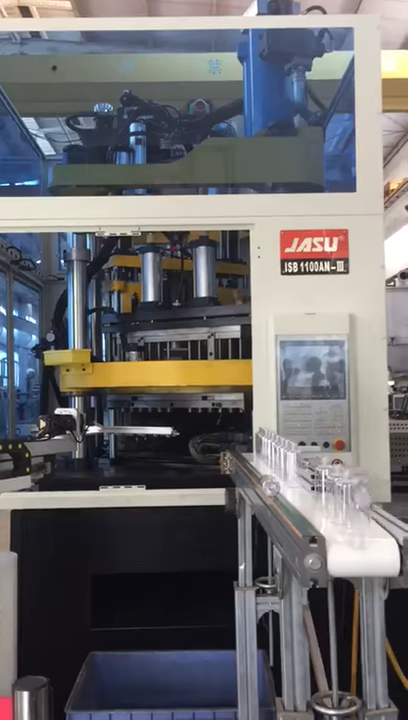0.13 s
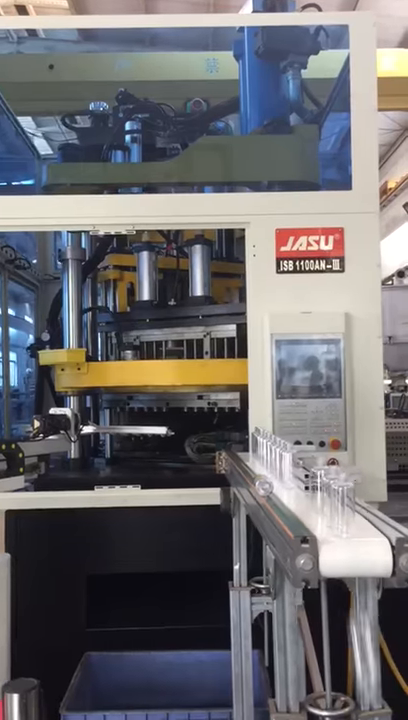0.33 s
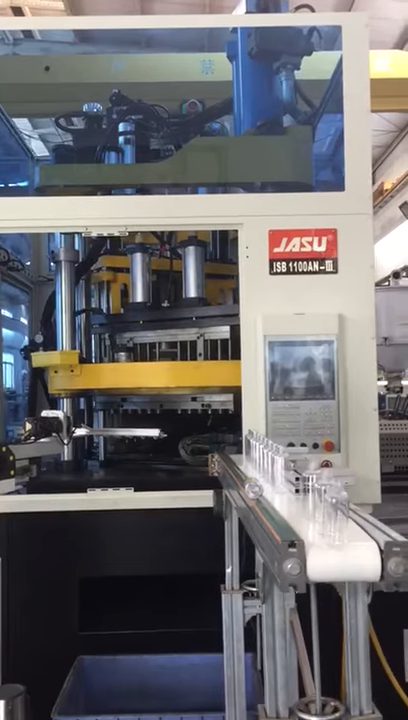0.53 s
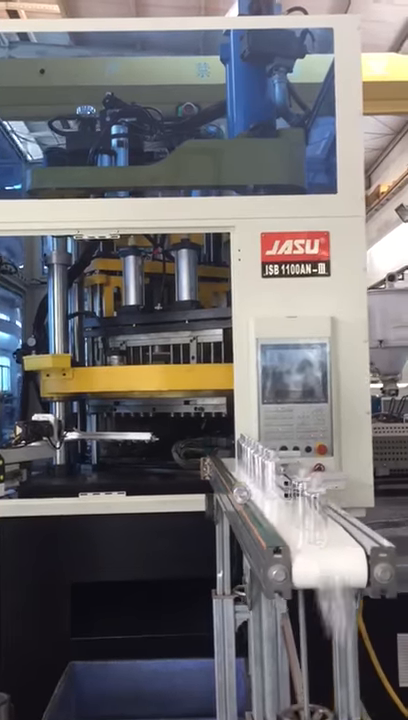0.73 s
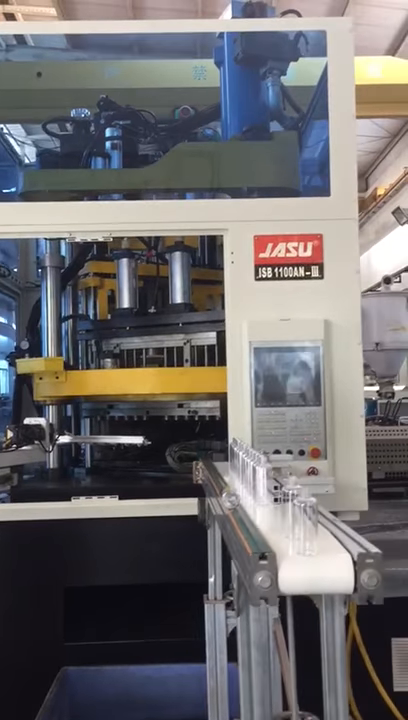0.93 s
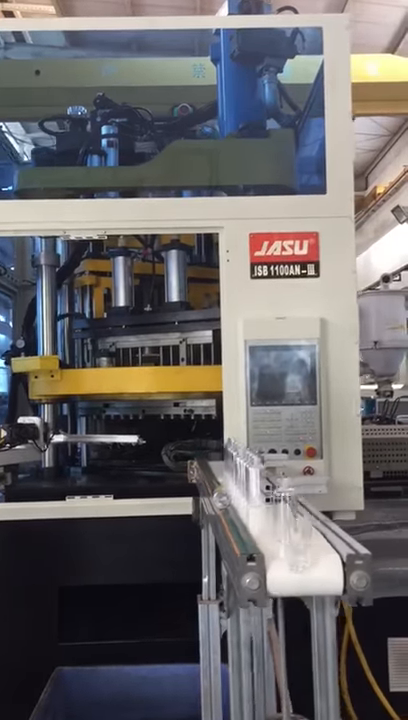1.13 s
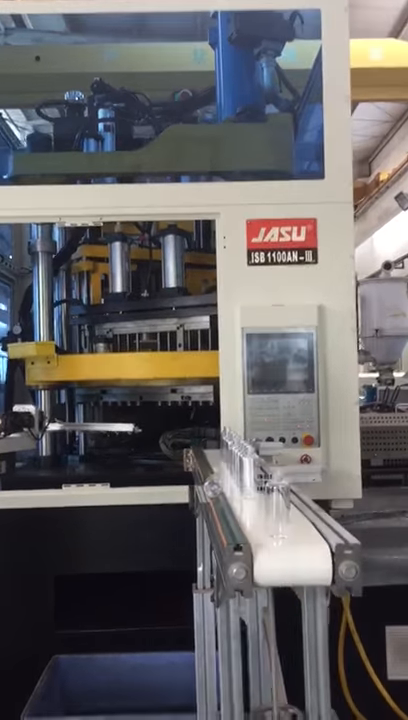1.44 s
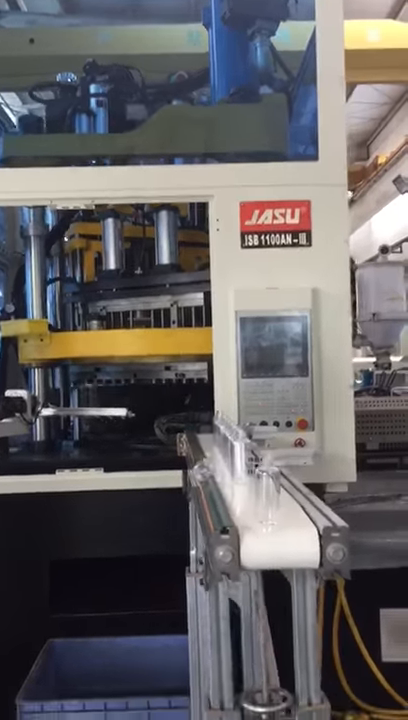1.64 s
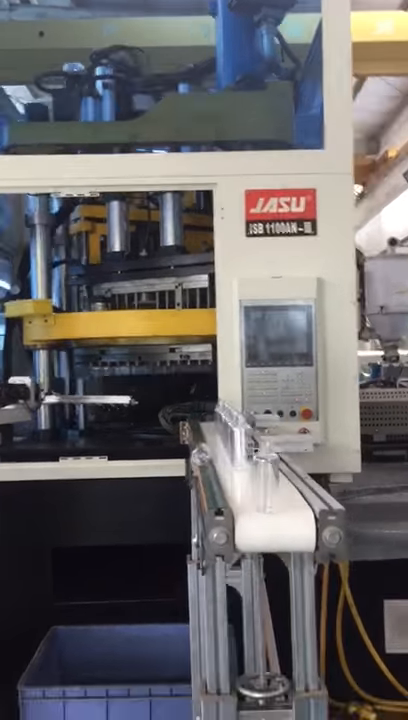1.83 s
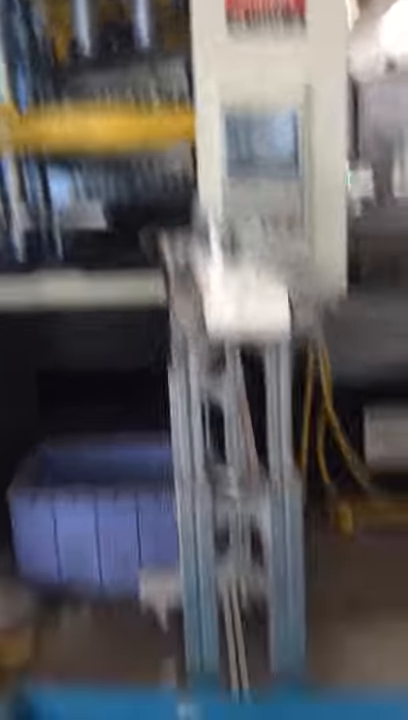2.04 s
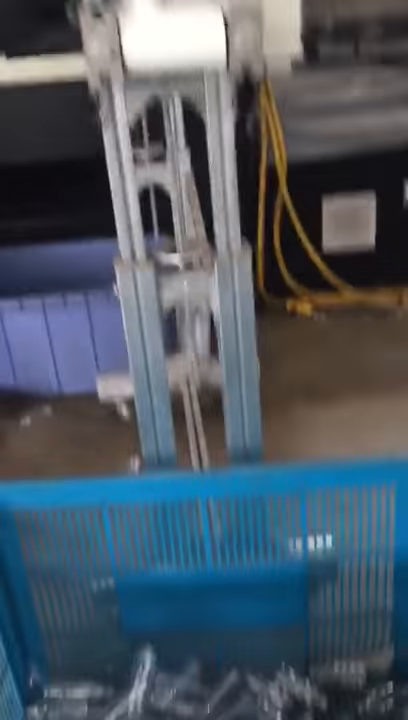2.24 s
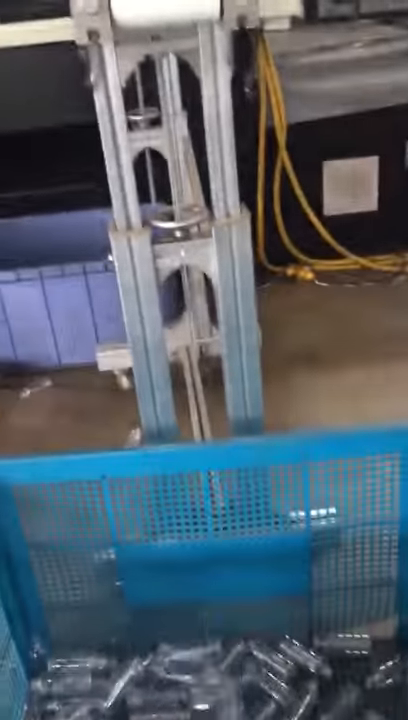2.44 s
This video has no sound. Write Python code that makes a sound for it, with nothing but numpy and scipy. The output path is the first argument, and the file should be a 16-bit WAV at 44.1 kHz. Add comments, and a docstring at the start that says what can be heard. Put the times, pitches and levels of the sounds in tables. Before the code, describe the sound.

Factory machine noise cuts in at about 0.1 s and continues throughout: low roar, wavering motor hum, swelling air hiss, faint bottle ticks. Clacks run from 0.3 s, sharpest at 1.25 s. Low thumps boom at 1.0 and 1.5 s, with a small air puff. A bottle cracks loudly at 1.77 s. A midrange rush swells around 2.2 s; clack, softer bottle knock and stronger puff end it near 2.5 s.

```python
"""In a factory hall, a blow moulding machine cuts in abruptly: pumps and motors hum over roar and air hiss.
Bottles tick faintly on the belt throughout; the mechanism soon clacks, then thumps and the frame booms.
From the middle on, two valve puffs let off air and two plastic bottles drop off the conveyor into a crate.
A midrange rush rises near the end as the microphone swings down towards the crate.
Shaped noise makes air and blows, sines the hums and rings; a noise tail puts the blows in the hall."""
import sys
import numpy as np
from scipy import signal
from scipy.fft import rfft, irfft
from scipy.io import wavfile
from scipy.ndimage import uniform_filter1d

SR = 44100
rng = np.random.default_rng(int(sys.argv[2]) if len(sys.argv) > 2 else 0)


def output_pcm(signal):
    """Save a mono or channel-first signal as 16-bit PCM at the path in sys.argv[1].

    Samples are clipped to [-1, 1] before scaling.
    """
    pcm = np.clip(np.atleast_2d(signal).T, -1, 1) * 32767
    wavfile.write(sys.argv[1], SR, np.round(pcm).astype(np.int16))


N = 114219
T = np.arange(N) / SR  # seconds


def amp(db):
    """Decibels to gain."""
    return 10 ** (np.asarray(db) / 20)


def unit(x):
    """Scales to rms 1."""
    return x / np.sqrt(np.mean(abs(x) ** 2) + 1e-20)


def level(points):
    """Gain over time from (time_s, level_db) points, held flat beyond the ends."""
    return amp(np.interp(T, *np.transpose(points)))


def since(start_s):
    """Seconds since the start, zero before it."""
    return np.maximum(T - start_s, 0)


def noise(points, tilt_db=0):
    """Noise of rms 1 with the given spectrum, tilted in dB per octave."""
    octave = np.log2(np.fft.rfftfreq(N, 1 / SR) + 1)
    pitch_hz, density_db = np.transpose(points)
    gain_db = np.interp(octave, np.log2(pitch_hz), density_db) + tilt_db * octave
    spectrum = rfft(rng.standard_normal(N)) * amp(gain_db)
    return unit(irfft(spectrum, N))


def waver(width_hz):
    """Random complex drift of rms 1; a wider band drifts faster."""
    hz = np.fft.fftfreq(N, 1 / SR)
    chance = rng.standard_normal(N) + 1j * rng.standard_normal(N)
    return unit(np.fft.ifft(np.fft.fft(chance) / (1 + (hz / width_hz) ** 2)))


def tone(pitch_hz, unsteady=0, width_hz=1):
    """A sine of about rms 1, of which a share of the power (0-1) wavers."""
    share = np.clip(unsteady, 0, 1)
    swing = np.sqrt(1 - share) + np.sqrt(share) * waver(width_hz)
    carrier = np.exp(2j * np.pi * (pitch_hz * T + rng.random()))  # random starting phase
    return np.sqrt(2) * (swing * carrier).real


def blows(rows, spectrum, rise_s):
    """Blows on heavily damped parts: dense vibration that rises fast and dies away."""
    out = np.zeros(N)
    for start_s, level_db, tilt_db, decay_s in rows:
        rise = np.minimum(since(start_s) / rise_s, 1)
        fall = np.exp(-since(start_s + rise_s) / decay_s)
        out += amp(level_db) * noise(spectrum, tilt_db) * rise * fall
    return out


PATCHY_DB, FLICKER_DB = 1.5, 0.5  # rms drift within neighbouring bands, and across all bands


def uneven(x):
    """Lets a noise drift in patches of time and pitch, and flicker across all bands."""
    bands = signal.stft(x, nperseg=256)[2]
    patches = uniform_filter1d(rng.standard_normal(bands.shape), size=5, axis=0)
    patches = unit(uniform_filter1d(patches, size=14, axis=1))
    flicker = unit(uniform_filter1d(rng.standard_normal(bands.shape[1]), size=3))
    return signal.istft(bands * amp(PATCHY_DB * patches + FLICKER_DB * flicker))[1][:N]


# spectrum of the hall's roar: pitch_hz, density_db (per Hz, relative)
ROAR_SPECTRUM = [(15, -66), (25, -43), (40, -21), (55, -7), (75, -2.5), (115, -3), (160, 1.5), (200, -5),
                 (250, -5), (300, -6.5), (350, -2.5), (410, -5.5), (470, -13.5), (720, -14), (1100, -16),
                 (1800, -17.5), (3000, -25.5), (4300, -24), (4900, -33.5), (9000, -38), (12000, -48)]
ROAR_DB = -24
# spectrum of the air hiss: pitch_hz, density_db (per Hz, relative)
HISS_SPECTRUM = [(300, -67), (1000, 10), (2000, 4), (4000, -8.5), (5000, -9.5), (6500, -11.5),
                 (10000, -18.5), (12000, -24)]
# rise and fall of the hiss: time_s, level_db
HISS_SWELL = [(.1, -34.5), (.45, -38.5), (.55, -32), (.72, -36.5), (.92, -30), (1.1, -31), (1.2, -33),
              (1.33, -31), (1.45, -36), (1.62, -30.5), (1.85, -40.5), (2.03, -41.5), (2.2, -34),
              (2.59, -37)]
# spectrum of the rush near the crate: pitch_hz, density_db (per Hz, relative)
RUSH_SPECTRUM = [(500, -14), (1300, -4.5), (2700, 0), (3800, -8.5), (5000, -17.5), (12000, -26)]
# the rush as the microphone swings down: time_s, level_db
RUSH_SWELL = [(2.05, -41), (2.14, -32), (2.23, -30.5), (2.34, -33), (2.45, -34.5), (2.59, -42)]


def air():
    """Broadband noises of moving air: the hall's roar, the hiss and the rush near the crate."""
    roar = amp(ROAR_DB) * noise(ROAR_SPECTRUM)
    hiss = level(HISS_SWELL) * noise(HISS_SPECTRUM)
    rush = level(RUSH_SWELL) * noise(RUSH_SPECTRUM)
    return uneven(roar + hiss + rush)


# two pumps before their common swell: pitch_hz, level_db
PUMP_TONES = [(188.3, -30), (210, -31.5)]
# common swell of the pumps: time_s, gain_db
PUMP_GAIN = [(.1, 0), (1.1, 1), (1.9, 0), (2.3, 4), (2.59, 4.5)]
# main motor hum: time_s, level_db
MOTOR_SWELL = [(.1, -33), (.21, -18.5), (.34, -29.5), (.43, -24), (.63, -21.5), (.76, -33), (.95, -31),
               (1.04, -26), (1.13, -34.5), (1.23, -27), (1.37, -23), (1.53, -28.5), (1.62, -23.5),
               (1.88, -30), (1.99, -24.5), (2.08, -35.5), (2.16, -25), (2.36, -36.5), (2.55, -24.5)]
MOTOR_HZ, MOTOR_UNSTEADY, MOTOR_WAVER_HZ = 296.1, 0.079, 8.3
# about an octave above the motor hum: time_s, level_db
OCTAVE_SWELL = [(.1, -37.5), (.62, -37), (.95, -51), (1.25, -41), (1.4, -35.5), (1.55, -39), (1.75, -40.5),
                (2.15, -40.5), (2.28, -43), (2.43, -35), (2.59, -45)]
OCTAVE_HZ, OCTAVE_UNSTEADY, OCTAVE_WAVER_HZ = 592.3, 0.37, 9.4
# higher whine: time_s, level_db
WHINE_SWELL = [(.1, -33), (.45, -33.5), (1.0, -37), (1.6, -42), (2.0, -52), (2.22, -32), (2.4, -53)]
WHINE_HZ, WHINE_UNSTEADY, WHINE_WAVER_HZ = 653.3, 0.13, 4.6
# the whine's upper partial, a fifth higher: time_s, level_db
UPPER_SWELL = [(.1, -48), (.6, -42), (.95, -38), (1.5, -36), (2.0, -38.5), (2.25, -36), (2.5, -67)]
UPPER_RATIO = 3 / 2
# fainter machine tones: pitch_hz, level_db, unsteady_share (0-1), waver_hz
FAINT_TONES = [(372, -33.5, 1, 13.6), (822, -50.5, 0.46, 2.7), (3670, -54, 0.3, 6), (7900, -76, .3, 5)]


def motors():
    """Rotating parts as sines: two pumps beat together under a swelling motor hum and a whine."""
    pumps = level(PUMP_GAIN) * sum(amp(level_db) * tone(pitch_hz) for pitch_hz, level_db in PUMP_TONES)
    motor = level(MOTOR_SWELL) * tone(MOTOR_HZ, MOTOR_UNSTEADY, MOTOR_WAVER_HZ)
    octave = level(OCTAVE_SWELL) * tone(OCTAVE_HZ, OCTAVE_UNSTEADY, OCTAVE_WAVER_HZ)
    whine = level(WHINE_SWELL) * tone(WHINE_HZ, WHINE_UNSTEADY, WHINE_WAVER_HZ)
    upper = level(UPPER_SWELL) * tone(WHINE_HZ * UPPER_RATIO)
    faint = np.zeros(N)
    for pitch_hz, level_db, share, waver_hz in FAINT_TONES:
        faint += amp(level_db) * tone(pitch_hz, share, waver_hz)
    return pumps + motor + octave + whine + upper + faint


# spectrum shared by belt ticks and clacks: pitch_hz, density_db (per Hz, relative)
CLACK_SPECTRUM = [(30, -60), (200, -21), (600, -3), (1300, 4), (2200, 3), (3000, -2), (4500, -7),
                  (6500, -6.5), (8000, -14), (10000, -12.5), (12000, -22)]
TICKS_PER_S, TICKS_DB, TICK_DECAY_S = 51, -45.5, 0.0052  # mean rate, overall rms, decay


def jostle():
    """Faint ticks of bottles touching on the belt: noise bursts at random times and strengths."""
    hits = (rng.random(N) < TICKS_PER_S / SR) * rng.uniform(0.25, 1, N)
    envelope = signal.lfilter([1], [1, -np.exp(-1 / (TICK_DECAY_S * SR))], hits)
    return amp(TICKS_DB) * unit(envelope * noise(CLACK_SPECTRUM))


# clacks, level before the envelope: start_s, level_db, tilt_db (per octave), decay_s
CLACK_BLOWS = [(.280, -20.5, 0, .016), (.403, -22, 1.5, 0.0029), (.519, -29, -15, 0.024),
               (.548, -16, -5, .009), (.7705, -22, -2.5, 0.02), (.7855, -17.5, 0.5, 0.013),
               (.799, -21.5, -1.5, 0.018), (.903, -26.5, -2, 0.0084), (1.003, -31, 2, 0.012),
               (1.077, -23, -1.5, 0.0065), (1.2451, -8.5, 2.5, 0.006), (1.256, -22, -4, 0.022),
               (1.343, -23.5, 2, 0.0026), (2.445, -18, -0.5, 0.0063), (2.4545, -24.5, 1.5, 0.019)]


def clacks():
    """The mechanism clacks: bursts that rise in under a millisecond."""
    return blows(CLACK_BLOWS, CLACK_SPECTRUM, rise_s=0.00072)


# heavy thumps, level before the envelope: start_s, level_db, tilt_db (per octave), decay_s
THUMP_BLOWS = [(.989, -14.5, -0.5, 0.032), (1.528, -12.5, 2.5, 0.021), (2.468, -19, 2.5, 0.0072)]
# spectrum of a thump before its tilt: pitch_hz, density_db (per Hz, relative)
THUMP_SPECTRUM = [(30, -22), (90, 11), (170, -7.5), (260, -1.5), (400, -1.5), (600, -11), (1000, -10.5),
                  (1600, -17), (3000, -39), (10000, -54)]


def thumps():
    """Heavy parts of the machine thump: low noise that rises more slowly than a clack."""
    return blows(THUMP_BLOWS, THUMP_SPECTRUM, rise_s=0.012)


# booms of the frame around the thumps, level at the envelope's peak: start_s, pitch_hz, level_db
FRAME_BOOMS = [(1.005, 106, -18.5), (1.055, 146, -16.5), (1.524, 167, -17.5), (1.549, 107, -13.5),
               (1.664, 141, -20)]
BOOM_PEAK_S = 0.012  # from start to the envelope's peak


def booms():
    """The frame swings for a few cycles: low sines that swell and die away."""
    out = np.zeros(N)
    for start_s, pitch_hz, level_db in FRAME_BOOMS:
        t = since(start_s)
        envelope = t / BOOM_PEAK_S * np.exp(1 - t / BOOM_PEAK_S)
        out += amp(level_db) * envelope * np.sin(2 * np.pi * pitch_hz * t)
    return out


# valve puffs, level before the envelope: start_s, length_s, level_db, tilt_db (per octave)
VALVE_PUFFS = [(1.51, 0.036, -29, 8.5), (2.536, .07, -21.5, 0)]
# spectrum of a puff before its tilt: pitch_hz, density_db (per Hz, relative)
PUFF_SPECTRUM = [(30, -64), (200, -18), (900, 13), (1800, 9.5), (3200, 7.5), (4800, -5.5), (6500, -4),
                 (9500, -16.5), (12000, -28)]
PUFF_RISE_S, PUFF_FALL_S = 0.0062, 0.027


def valves():
    """Short puffs of exhaust air: noise that rises, holds and falls away."""
    out = np.zeros(N)
    for start_s, length_s, level_db, tilt_db in VALVE_PUFFS:
        rise = np.minimum(since(start_s) / PUFF_RISE_S, 1)
        fall = np.exp(-since(start_s + length_s) / PUFF_FALL_S)
        out += amp(level_db) * noise(PUFF_SPECTRUM, tilt_db) * rise * fall
    return out


# bottle knocks: start_s, ring_gain_db, low_mode_gain_db (added below LOW_MODES_HZ), crack_level_db
BOTTLE_KNOCKS = [(1.7677, -0.5, 0, -8), (2.4638, -1, -6.5, -33)]
# modes of the thin wall before the knock's gains: pitch_hz, level_db, t60_s, build_up_s
BOTTLE_MODES = [(1370, -27, .06, 0.0017), (1736, 2, 0.025, 0.0032), (1776, -13, 0.083, 0.0034),
                (2217, -16, 0.12, 0.0036), (2640, -13, 0.026, 0.0013), (3270, -21.5, 0.043, 0.00082),
                (3770, -20, 0.062, 0.0008), (3932, 2.5, 0.014, 0.0011), (5030, -24, 0.026, 0.0011),
                (5900, -16.5, 0.016, 0.00046), (7800, -30, 0.016, .0005)]
# crack of the first contact: pitch_hz, density_db (per Hz, relative)
CRACK_SPECTRUM = [(30, -40), (250, -12), (700, 3), (1500, -4), (3000, 1), (4500, -3), (6200, -3),
                  (7200, -3), (9000, -0.5), (11500, -8), (12500, -18)]
LOW_MODES_HZ, CRACK_DECAY_S, CRACK_RISE_S = 2500, 0.0022, 0.00044


def bottles():
    """Each bottle lands in the crate with a crack, and the modes of its thin wall ring briefly."""
    out = np.zeros(N)
    for start_s, ring_db, low_db, crack_db in BOTTLE_KNOCKS:
        t = since(start_s)
        out += blows([(start_s, crack_db, 0, CRACK_DECAY_S)], CRACK_SPECTRUM, CRACK_RISE_S)
        for pitch_hz, mode_db, t60_s, build_s in BOTTLE_MODES:
            build = 1 - np.exp(-(t / build_s) ** 2)
            fade = np.exp(-np.log(1000) * t / t60_s)
            gain = amp(ring_db + mode_db + low_db * (pitch_hz < LOW_MODES_HZ))
            out += gain * build * fade * np.sin(2 * np.pi * pitch_hz * t)
    return out


# colour of the hall's tail: pitch_hz, density_db (per Hz, relative)
TAIL_SPECTRUM = [(100, 1), (1500, 1), (2500, 10), (4000, -1), (12000, -3)]
TAIL_T60_S, TAIL_DB, ECHO_T60_S, ECHO_DB = 0.28, -16, 0.046, -13


def hall(x):
    """Quick echoes from the machine's panels and a fainter, longer tail: decaying noise responses."""
    echo = rng.standard_normal(N) * (T > .004) * np.exp(-np.log(1000) * T / ECHO_T60_S)
    tail = noise(TAIL_SPECTRUM) * (T > .015) * np.exp(-np.log(1000) * T / TAIL_T60_S)
    response = amp(ECHO_DB) * echo / np.linalg.norm(echo)
    response += amp(TAIL_DB) * tail / np.linalg.norm(tail)
    return x + signal.fftconvolve(x, response)[:N]


def scene():
    """Air and motors reach the microphone directly; blows, puffs and bottles also echo in the hall."""
    events = jostle() + clacks() + thumps() + booms() + valves() + bottles()
    return (air() + motors() + hall(events))[None]


START_S, CEILING, EDGE_HZ = .083, .85, 12150  # cut-in, peak ceiling, upper band edge


def record(dry):
    """The sound cuts in abruptly, the loudest peaks are rounded off; then the band limit."""
    opened = dry * np.clip((T - START_S) / .002, 0, 1)
    rounded = opened / (1 + (opened / CEILING) ** 6) ** (1 / 6)
    lowpass = signal.firwin(255, EDGE_HZ, window=("kaiser", 9), fs=SR)
    return signal.oaconvolve(rounded, lowpass[None], "same")


dry = scene()
out = record(dry)
output_pcm(out)
```